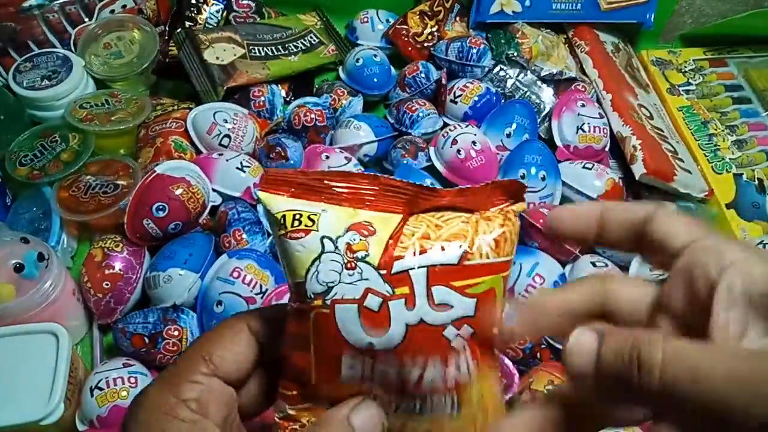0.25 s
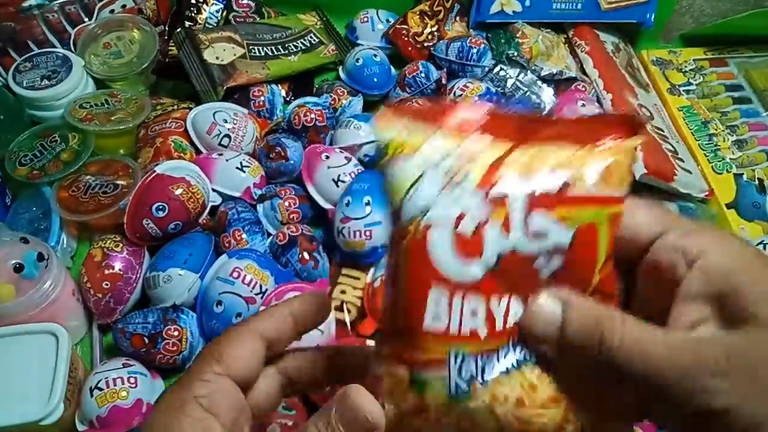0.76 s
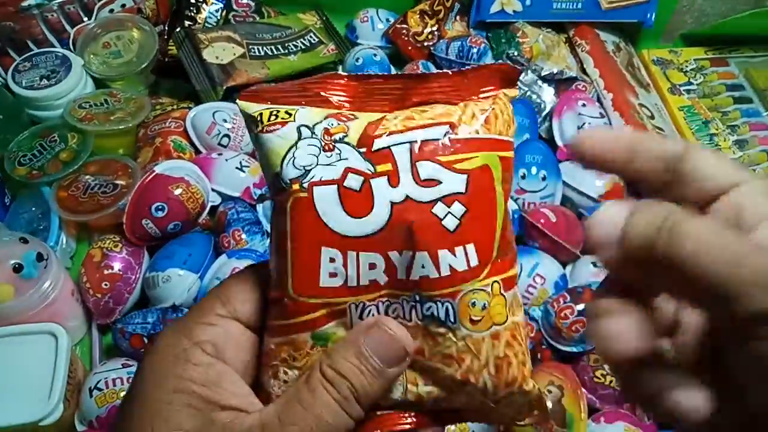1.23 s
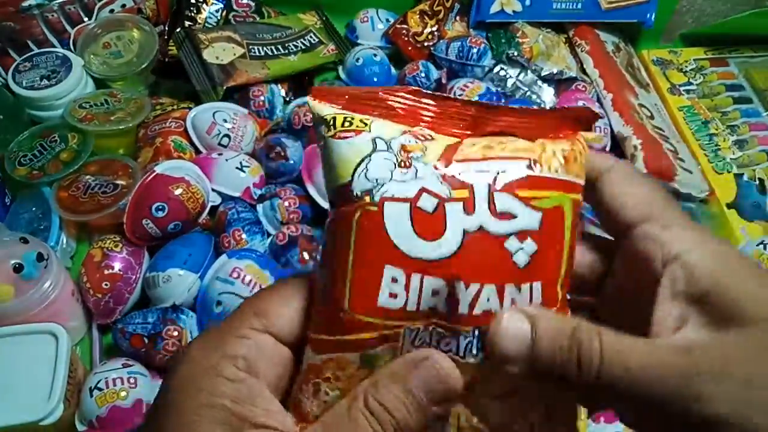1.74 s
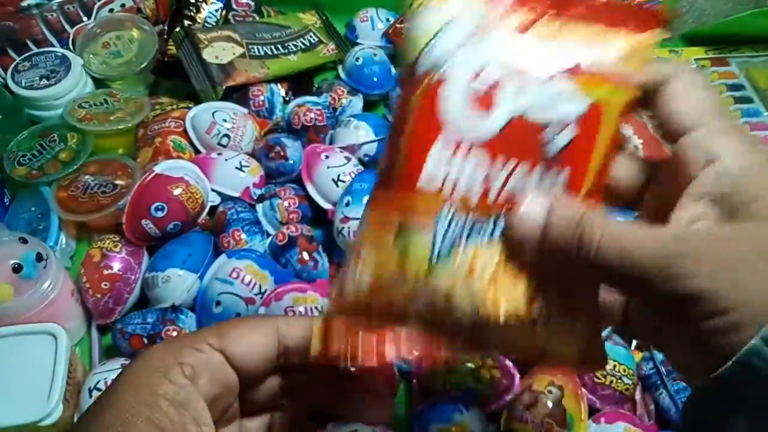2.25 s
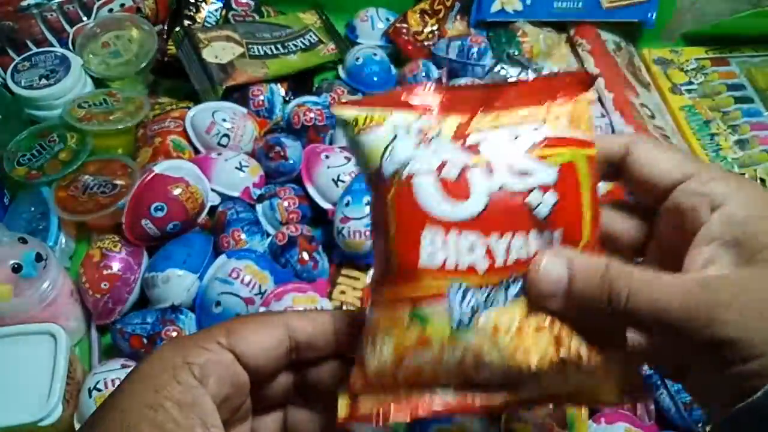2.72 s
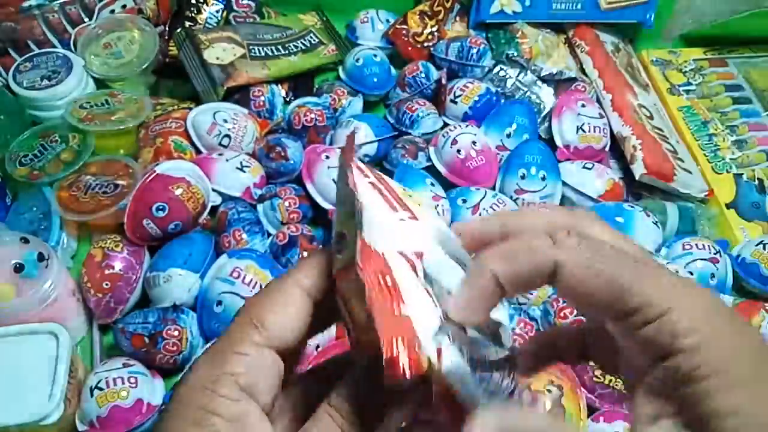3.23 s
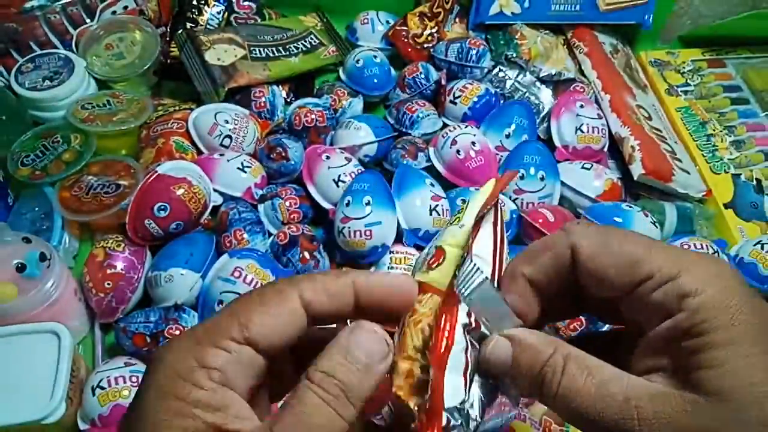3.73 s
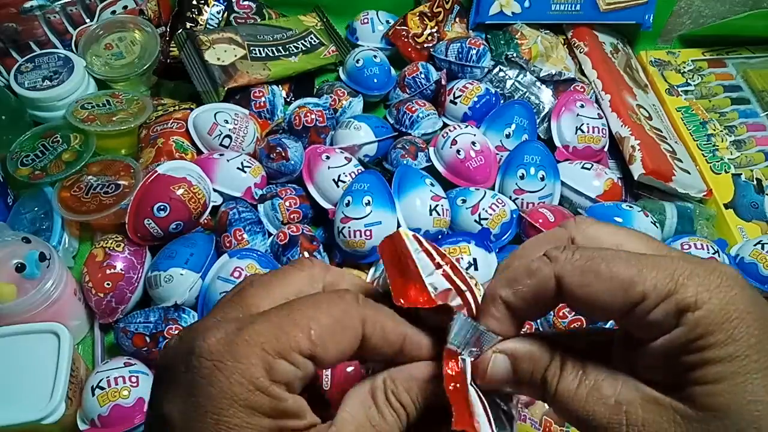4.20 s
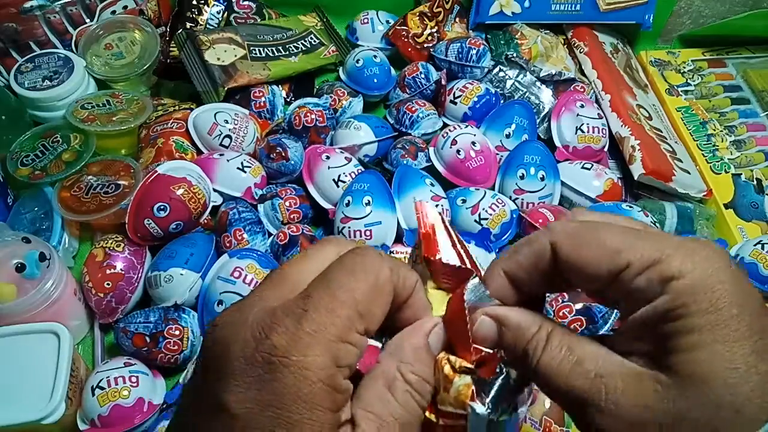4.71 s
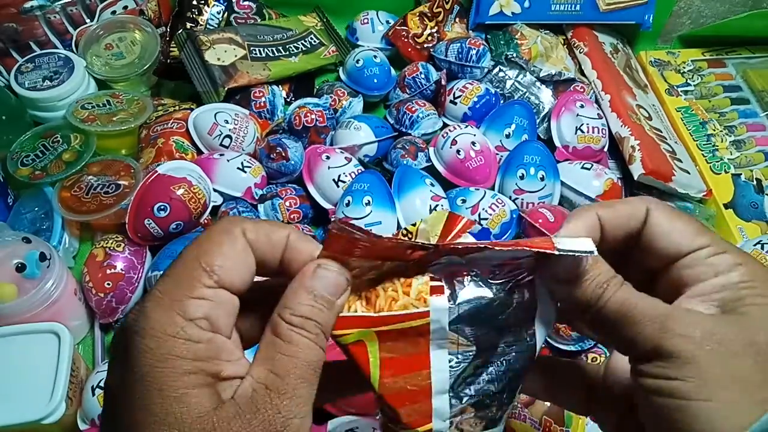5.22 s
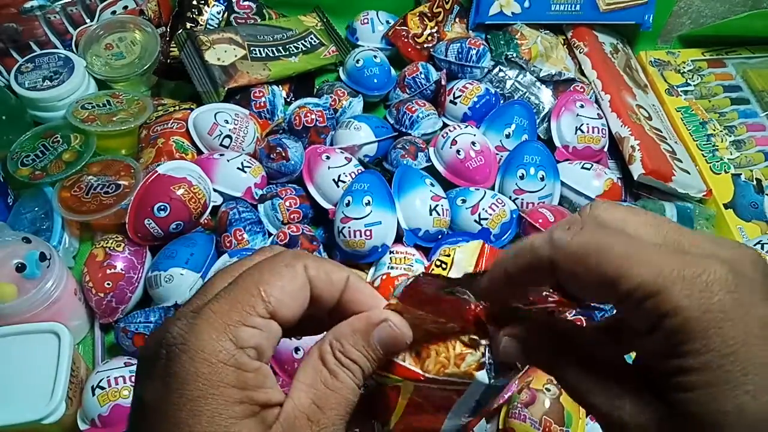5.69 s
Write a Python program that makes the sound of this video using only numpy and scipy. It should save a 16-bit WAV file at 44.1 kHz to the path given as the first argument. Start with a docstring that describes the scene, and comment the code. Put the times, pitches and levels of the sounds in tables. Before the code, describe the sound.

A finger slaps a puffy foil snack packet, dry noodles are shaken in rattling strokes, then the film crackles and the seam rips open.

```python
"""Dry noodles in a foil-lined packet

A finger slaps the air-filled packet five times: film cracks over a damped bounce of the trapped air.
After the third slap and again after the fifth the dry noodles are shaken, clicks swelling at each stroke.
The film is pinched and crackles, each flipping crease being a brief crack with a ringing facet.
The seam rips open in two pulls, a fast run of tiny breaks, and the open packet rustles.
All of it is heard close by in a small room, over a quiet hiss, a rumble and a low drone."""
import sys
import numpy as np
from scipy import signal
from scipy.fft import rfft, irfft
from scipy.io import wavfile

SR = 44100
rng = np.random.default_rng(int(sys.argv[2]) if len(sys.argv) > 2 else 0)


def dump_mix(stems):
    """Bounce the given channels to the path in sys.argv[1] as a 16-bit WAV at rate SR."""
    frames = np.atleast_2d(stems).T  # one column per channel
    limited = np.clip(frames, -1, 1)  # hard clip at full scale
    pcm = np.round(limited * 32767).astype(np.int16)
    wavfile.write(sys.argv[1], SR, pcm)


N = 262395

# Levels in the tables are relative: the source functions add their own trims.
# quiet-room noise spectrum: frequency_hz, level_db
HUSH_SPECTRUM = [(25, -17), (60, 3.5), (105, -1.5), (180, -3), (1000, -24), (3500, -16), (6000, -40),
                 (10000, -36), (15000, -31)]
# low drone that comes and goes: time_s, level_db
DRONE_LEVEL = [(0, -68), (2.3, -60.5), (4.2, -66.5), (4.6, -57.5), (5.95, -55)]
# reverberation of the room: frequency_hz, t60_s
ROOM_DECAY = [(100, 0.34), (250, 0.27), (800, 0.17), (3000, 0.24), (6000, 0.18), (14000, 0.36)]
# soft bumps of the hands on the packet: start_s, level_db, pitch_hz
BUMPS = [(0.597, -42, 264), (1.203, -40, 318), (1.818, -43, 222), (5.537, -40.5, 304), (5.633, -39, 220),
         (5.701, -39.5, 192), (5.829, -37, 268), (5.934, -28, 250)]
# spectrum of flipping film: frequency_hz, level_db
FILM_SPECTRUM = [(40, -70), (100, -33), (250, -8), (500, -9), (800, -3), (1200, -5), (2400, -2.5),
                 (3700, -1), (4400, -4.5), (5500, -8.5), (7500, -21.5), (10000, -32), (15000, -31)]
# effort of the fingers working the film: time_s, level_db
FINGER_EFFORT = [(3.2, -42.5), (3.6, -41), (3.88, -37), (4.17, -46), (4.33, -36.5), (4.47, -43.5),
                 (4.9, -45), (5.35, -50), (5.79, -49.5), (5.95, -28)]
# folds collapsing in clumps of small creases: peak_s, level_db, half_length_s
FOLD_COLLAPSES = [(0.665, -23, 0.0091), (3.636, -29, 0.017), (3.676, -30, 0.0097), (3.758, -30.5, 0.0099),
                  (3.83, -26, 0.009), (3.982, -22, 0.015), (4.285, -16, 0.0052), (4.193, -34.5, 0.0087),
                  (4.354, -28.5, 0.008), (4.567, -32, 0.02), (4.679, -34.5, 0.02), (5.41, -36, 0.014),
                  (5.539, -34.5, 0.005), (5.645, -37, 0.011)]
# large creases snapping through: time_s, level_db, facet_pitch_hz, ring_to_crack_db
SNAPS = [(0.614, -22, 3670, -13), (0.719, -16.5, 1720, -8), (0.918, -3, 3300, 19), (0.976, -7, 865, 15),
         (1.162, -12.5, 3330, 0.5), (1.648, -9.5, 2890, -4.5), (1.657, -9.5, 3400, 4),
         (1.802, -30.5, 2930, -11), (1.865, -14, 1540, -13), (1.923, -4, 3930, -3.5), (2.317, -11, 3380, 0),
         (3.293, -14.5, 2920, -5), (3.348, -24, 2120, 8), (3.393, -27.5, 3480, 2),
         (3.495, -5.5, 2140, -4.5), (3.51, -2.5, 790, 7.5), (3.598, -18, 2500, -4),
         (3.631, -14.5, 3170, 18), (3.683, -19.5, 1010, 15), (3.753, -12.5, 3200, -4.5),
         (3.821, -4.5, 3280, -1.5), (3.84, -6, 1770, -3), (3.868, -15, 1770, 23), (3.9, -18, 2920, 14),
         (3.962, -8, 3320, -13), (3.973, -7.5, 3670, -7), (3.997, -18, 3550, -15), (4.016, -14.5, 3730, -2),
         (4.028, -16.5, 2260, 2), (4.051, -14, 2180, 15), (4.059, -14.5, 2840, 0), (4.082, -11, 1830, 7),
         (4.119, -10.5, 2750, 1), (4.234, -7.5, 2850, 20), (4.282, -11.5, 3800, 5), (4.351, -10, 3300, -2),
         (4.378, -13.5, 2800, -4.5), (4.43, -19, 3600, -11), (4.474, -22, 1740, -8),
         (4.499, -19.5, 2800, -3.5), (4.542, -22, 4170, -10), (4.563, -18, 1690, -14),
         (4.618, -24, 3900, -25), (4.682, -20, 2900, -12), (4.72, -20, 2170, 25), (4.733, -23.5, 3470, 14),
         (4.818, -23, 3500, -8), (4.835, -20, 2900, -21), (4.861, -23, 3100, -12), (4.957, -6.5, 3730, -3),
         (4.977, -7.5, 1230, 1), (4.987, -6.5, 2700, 13), (5.124, -15, 3430, 9), (5.142, -15, 2860, 4),
         (5.154, -4, 895, -1), (5.184, -3, 3660, -2), (5.213, -8.5, 750, -2), (5.237, -14, 3660, -16),
         (5.496, -23.5, 2270, -5), (5.672, -27.5, 3750, 1), (5.699, -24, 4030, -12)]
# spectrum of the tearing seam: frequency_hz, level_db
SEAM_SPECTRUM = [(40, -45), (120, -21), (300, -2.5), (550, -7.5), (800, -3.5), (1200, -6), (2700, -7),
                 (3700, -5), (5200, -8.5), (7400, -20), (10300, -30.5), (15000, -29)]
# pulls that open the seam: start_s, length_s, full_force_db, scattered_noodles_db
PULLS = [(4.919, 0.057, -16.5, -30), (5.11, 0.13, -17.5, -44)]
# spectrum of noodles hitting film: frequency_hz, level_db
NOODLE_SPECTRUM = [(40, -54), (90, -17), (140, -15), (250, -6), (550, -6), (820, 1), (1200, -4), (1600, -2),
                   (3300, -5), (4300, -9), (5500, -18), (7500, -34.5), (11000, -46.5), (15000, -43.5)]
# bouts of shaking: first_landing_s, length_s, first_beat_s, beat_shortening_s, start_db, fade_db
SHAKES = [(0.815, 0.32, 0.0795, 0.00097, -16, 17.5), (2.038, 1.01, 0.0772, 0.00097, -20, 8)]
# single drops of the noodles: tips, turns and the last weak stroke of the shaking:
# peak_s, level_db, half_length_s
DROPS = [(0.662, -28.5, 0.012), (0.718, -34, 0.037), (1.172, -26.5, 0.018), (1.201, -26, 0.0065),
         (1.832, -43.5, 0.017), (1.871, -27.5, 0.0066), (1.924, -27, 0.024), (3.104, -34.5, 0.02),
         (3.182, -29, 0.016), (3.234, -29, 0.0086), (3.28, -22.5, 0.0091), (3.485, -27.5, 0.012),
         (3.524, -27, 0.012)]
# loose crumbs shifting as the opened packet is handled: time_s, level_db
SHIFTING = [(5.28, -48), (5.78, -52), (5.92, -40.5), (5.95, -27.5)]
# spectrum of a slap on the film: frequency_hz, level_db
SLAP_SPECTRUM = [(40, -10.5), (100, -0.5), (250, -2), (450, -7), (800, -0.5), (1400, -1.5), (3000, 0),
                 (4200, -1.5), (5500, -18.5), (7500, -26.5), (10000, -41), (15000, -36)]
# finger slaps: time_s, crack_db, crack_decay_s, thump_db, thump_hz, scattered_noodles_db, settle_db_per_s
SLAPS = [(0.0072, -1.5, 0.011, -12.5, 202, -17.5, 206), (0.1984, -2.5, 0.0095, -18.5, 146, -15.5, 162),
         (0.3747, -2.5, 0.003, -21, 165, -21, 133), (1.3927, -1.5, 0.0055, -14, 240, -14.5, 244),
         (1.6008, -6, 0.0066, -15.5, 116, -19, 192)]

EDGE_HZ = 15800  # upper band limit
# a pull starts this much weaker, builds, and lets go with a jolt
SLACK_DB, LET_GO_S, PULL_SETTLE_DB_PER_S = -12, 0.012, 196
TIRING = 3.73  # the shaking holds its strength, then fades with this power of the time
# half length of a firm landing; loose crumbs slide on after it and settle
LAND_S, SLIDE_DB, SETTLE_DB_PER_S = 0.012, -12, 146
FIRM_DB, SMEAR = -20, 0.49  # the weaker a stroke is than FIRM_DB, the more its landing is spread out
# by chance a stroke lands looser, so weaker (dB) and longer (share), or tighter, the reverse
UNEVEN_DB, UNEVEN_SPREAD = 1.0, 0.25
DROP_SLIDE_DB, DROP_SETTLE_DB_PER_S = -22, 208  # the same sliding after a single drop
SCATTER_RISE_S = 0.0081  # time constant with which the sound of thrown crumbs builds


def gain_of(db):
    """Logarithmic law of level: decibels to amplitude."""
    return 10 ** (np.asarray(db) / 20)


def unit(x):
    """Energy normalisation: scales the sum of squares to 1."""
    return x / np.sqrt(np.sum(x ** 2) + 1e-20)


def read(points, hz):
    """Interpolation of a spectrum on a log-frequency axis."""
    f, value = np.transpose(points)
    return np.interp(np.log(hz + 1), np.log(f + 1), value)


def level(rows):
    """Level curve as amplitude at every sample, virtually silent outside its span."""
    s, db = np.transpose(rows)
    return gain_of(np.interp(np.arange(N) / SR, s, db, left=-120, right=-120))


def add(mix, s, sound):
    """Superposition: mixes a sound in at time s."""
    part = mix[max(round(s * SR), 0):][:len(sound)]
    part += sound[:len(part)]


def colour(x, points, size=2048):
    """Minimum-phase filtering: a causal response lets clicks keep their sharp front."""
    log_gain = np.log(gain_of(read(points, abs(np.fft.fftfreq(size, 1 / SR)))))
    taps = np.fft.ifft(np.exp(np.conj(signal.hilbert(log_gain)))).real
    return signal.oaconvolve(x, unit(taps[:size // 2]))[:len(x)]


def facet(hz, ring_db, ring_s, crack_s=0.00034, size=1024):
    """Impulse excitation: a crease flips with a brief crack and the film beside it rings for a few cycles."""
    t = np.arange(size) / SR
    crack = unit(rng.standard_normal(size) * np.exp(-t / crack_s))
    ring = unit(np.exp(-t / ring_s) * np.sin(2 * np.pi * hz * t))
    return unit(crack + gain_of(ring_db) * ring)


def crackle(per_s, spread_db, ring_db, ring_s, spectrum, steady_s, variety_db=9, count=30):
    """Shot noise: random clicks of many sizes and pitches, held near rms 1 over steady_s."""
    chance = rng.random(N)
    size = np.minimum(rng.exponential(1, N), 4)
    which = rng.integers(0, count, N)
    clicks = (chance < per_s / SR) * gain_of(spread_db * size) * rng.choice([-1, 1], N)
    # three ring strengths take turns over the pitches
    bank = np.array([facet(hz, ring_db + variety_db * (k % 3 - 1), ring_s)
                     for k, hz in enumerate(np.linspace(450, 4600, count))])
    at = np.flatnonzero(clicks)
    places = at[:, None] + np.arange(bank.shape[1])
    sounds = clicks[at, None] * bank[which[at]]
    out = np.bincount(places.ravel(), sounds.ravel(), N)[:N]
    out = colour(out, spectrum)
    window = signal.windows.hann(int(steady_s * SR))
    power = abs(signal.oaconvolve(out ** 2, window / window.sum(), "same"))
    return out / np.sqrt(power + 1e-4 * np.mean(out ** 2))


def hush(hush_db=-62):
    """Stationary noise: the quiet room is a low rumble under faint hiss."""
    return gain_of(hush_db) * np.sqrt(N) * unit(colour(rng.standard_normal(N), HUSH_SPECTRUM))


def drone(drone_hz=105):
    """Band-filtered noise: a low drone about an octave wide with a slowly moving level."""
    octaves = np.log2((np.fft.rfftfreq(N, 1 / SR) + 1) / drone_hz)
    band = irfft(rfft(rng.standard_normal(N)) / (1 + (2 * octaves) ** 2), N)
    return level(DRONE_LEVEL) * np.sqrt(N) * unit(band)


def room(x, tail_db=-9, echo_db=-18, echo_s=.0132, build_s=0.022, soak_db=-5, size=22050):
    """Reverberation: one clear reflection, then a short tail of sparse taps that dies band by band."""
    taps = rng.choice([-1., 1.], size) * (rng.random(size) < 3000 / SR)
    hz, t, z = signal.stft(taps, SR, nperseg=256)
    decay = gain_of(-60 * t / read(ROOM_DECAY, hz)[:, None])
    tail = signal.istft(z * decay, SR, nperseg=256)[1][:size]
    build = 1 - np.exp(-np.arange(size) / SR / build_s)
    response = gain_of(tail_db) * unit(tail * build)
    add(response, echo_s, gain_of([echo_db]))
    # the surroundings soak up the top octaves
    soak = gain_of(np.interp(np.fft.rfftfreq(size, 1 / SR), [4500, 9000], [0, soak_db]))
    return x + signal.oaconvolve(x, irfft(rfft(response) * soak, size))[:N]


def thud(hz, decay_s, rise_s, size=6000):
    """Damped oscillation: trapped air bounces for a few cycles; the sound follows the film's speed."""
    t = np.arange(size) / SR
    bulge = np.sin(2 * np.pi * hz * t) * np.exp(-t / decay_s) * (1 - np.exp(-t / rise_s))
    return np.gradient(bulge) * SR / (2 * np.pi * hz)


def bumps(bump_db=6, decay_s=0.0073, rise_s=0.0021):
    """Soft excitation: a push sounds the air inside without cracking the film."""
    out = np.zeros(N)
    for s, db, hz in BUMPS:
        add(out, s, gain_of(db + bump_db) * thud(hz, decay_s, rise_s))
    return out


def ticks(tick_db=24, spread_db=2.0, taut_hz=500):
    """Random buckling: middling creases in pinched film flip with a dry tick, as hard as it is worked."""
    per_s, ring_db, ring_s = 28, -3, .0008
    out, effort = np.zeros(N), level(FINGER_EFFORT)
    for k, (when, pitch, strength) in enumerate(rng.random((int(per_s * N / SR), 3))):
        s = (k + when) / per_s
        click = facet(900 + 3000 * pitch, ring_db, ring_s)
        gain = gain_of(tick_db + spread_db * (2 * strength - 1))
        add(out, s, effort[int(s * SR)] * gain * click)
    return signal.lfilter(*signal.butter(1, taut_hz, "high", fs=SR), colour(out, FILM_SPECTRUM))


def bell(s, db, half_s):
    """Gaussian envelope: power of a bell-shaped burst."""
    return gain_of(db) ** 2 * np.exp(-np.minimum(((np.arange(N) / SR - s) / half_s) ** 2, 100))


def straining():
    """Power addition: crinkle amplitude from the fingers' effort and the folds that collapse."""
    return np.sqrt(level(FINGER_EFFORT) ** 2 + sum(bell(*row) for row in FOLD_COLLAPSES))


def crinkle(crinkle_db=-1.5, taut_hz=700):
    """Stick-slip: small creases keep flipping under the fingers, in clumps where a fold collapses."""
    ring_s, slip_db, slip_s = .0007, 3, .012
    grains = crackle(per_s=520, spread_db=4.0, ring_db=-2.0, ring_s=ring_s,
                     spectrum=FILM_SPECTRUM, steady_s=0.11)
    # small, tightly pinched patches radiate little bass
    grains = signal.lfilter(*signal.butter(1, taut_hz, "high", fs=SR), grains)
    # the fingertips stick and slip, so the strain comes in short fits
    knots = np.arange(0, N, slip_s * SR)
    slips = np.clip(rng.standard_normal(len(knots)), -2, 2)
    fits = gain_of(slip_db * np.interp(np.arange(N), knots, slips))
    return gain_of(crinkle_db) * straining() * fits * grains


def snaps(ring_s=0.00089, flutter_db=-8, flutter_s=0.0024, snap_db=13, lag_s=0.001002,
          creep_db=-22, size=1024):
    """Snap-through: a large crease creeps, flips, rings its facet and leaves the sheet fluttering."""
    out, t = np.zeros(N), np.arange(size) / SR
    creep_s = .005  # the creep sounds this long ahead of the tabled time
    for s, db, hz, ring_db in SNAPS:
        shape = np.exp(-t / flutter_s) * (1 - np.exp(-t / flutter_s))
        flutter = unit(rng.standard_normal(size) * shape)
        sheet = signal.unit_impulse(size) + gain_of(flutter_db) * flutter
        flip = signal.fftconvolve(facet(hz, ring_db, ring_s), sheet)[:size]
        add(out, s + lag_s, gain_of(db + snap_db) * unit(colour(flip, FILM_SPECTRUM)))
        add(out, s - creep_s, gain_of(db + snap_db + creep_db) * unit(colour(flutter, FILM_SPECTRUM)))
    return out


def pulling():
    """Build-up and release: each pull grows to full force and dies as the seam lets go."""
    out, t = np.zeros(N), np.arange(N) / SR
    for s, length, db, _ in PULLS:
        force = gain_of(db + SLACK_DB * np.maximum(1 - t / length, 0) ** 2)
        release = np.exp(-np.maximum(t - length, 0) / LET_GO_S)
        add(out, s, force * release)
    return out


def rip(rip_db=0, sealed_hz=420):
    """Progressive fracture: the seam parts in a quick run of tiny, uneven breaks."""
    breaks = crackle(per_s=1700, spread_db=3.3, ring_db=7, ring_s=0.00075,
                     spectrum=SEAM_SPECTRUM, steady_s=0.037)
    # the second pull frees a wide flap of film, which adds the bass
    thin = signal.sosfiltfilt(signal.butter(2, sealed_hz, "high", fs=SR, output="sos"), breaks)
    opened = np.interp(np.arange(N) / SR, [5.14, 5.21], [0, 1])
    return gain_of(rip_db) * pulling() * (thin + opened * (breaks - thin))


def settling(s, db, db_per_s):
    """Exponential decay: power of crumbs that are thrown up at time s, come down and settle."""
    t = np.maximum(np.arange(N) / SR - s, 0)
    return (gain_of(db - db_per_s * t) * (1 - np.exp(-t / SCATTER_RISE_S))) ** 2


def strokes(count=20):
    """Quickening oscillation: landings (time_s, level_db, half_length_s) weaken, blur and vary by chance."""
    rows, k = [], np.arange(count)
    for start, length, beat, quicken, first_db, fade_db in SHAKES:
        after = k * beat - quicken * k * (k - 1) / 2
        for s, loose in zip(after[after < length], rng.uniform(-1.02, 1, count)):
            db = first_db - fade_db * (s / length) ** TIRING
            half = LAND_S * gain_of(SMEAR * (FIRM_DB - db))
            rows.append((start + s, db - UNEVEN_DB * loose, half * (1 + UNEVEN_SPREAD * loose)))
    return rows


def agitation():
    """Power addition: every stroke, drop, slap and pull throws the noodles, and they settle."""
    power = level(SHIFTING) ** 2
    for s, db, half in strokes():
        power += bell(s, db, half) + settling(s, db + SLIDE_DB, SETTLE_DB_PER_S)
    for s, db, half in DROPS:
        power += bell(s, db, half) + settling(s, db + DROP_SLIDE_DB, DROP_SETTLE_DB_PER_S)
    for s, *_, db, db_per_s in SLAPS:
        power += settling(s, db, db_per_s)
    for s, length, _, db in PULLS:
        power += settling(s + length, db, PULL_SETTLE_DB_PER_S)
    return np.sqrt(power)


def noodles(noodles_db=0.5):
    """Granular impact: dry crumbs hit the film together at each stroke, and slide in between."""
    grains = crackle(per_s=2600, spread_db=2.5, ring_db=-6, ring_s=0.00069,
                     spectrum=NOODLE_SPECTRUM, steady_s=0.14)
    return gain_of(noodles_db) * agitation() * grains


def slaps(thump_s=0.0059, thump_rise_s=0.00053, crack_db=16, brush_db=-27, brush_s=.006, size=6000):
    """Impact on an air cushion: a finger brushes the film, buckles many creases at once and bounces."""
    out, t = np.zeros(N), np.arange(size) / SR
    for s, db, crack_s, thump_db, hz, *_ in SLAPS:
        # a faint brush leads up to the blow
        force = np.where(t < brush_s, gain_of(brush_db), np.exp(-(t - brush_s) / crack_s))
        crack = unit(colour(rng.standard_normal(size) * force, SLAP_SPECTRUM))
        add(out, s - brush_s, gain_of(db + crack_db) * crack)
        add(out, s, gain_of(thump_db) * thud(hz, thump_s, thump_rise_s))
    return out


def scene():
    """Superposition: the packet sounds in the room over the background."""
    packet = slaps() + bumps() + noodles() + snaps() + ticks() + crinkle() + rip()
    return (room(packet) + hush() + drone())[None]


def record(dry, low_cut_hz=72):
    """Transduction: the microphone drops deep bass and rounds off the loudest cracks; then the band limit."""
    thin = signal.sosfilt(signal.butter(4, low_cut_hz, "high", fs=SR, output="sos"), dry)
    held = thin / (1 + thin ** 8) ** (1 / 8)
    band_limit = signal.firwin(511, EDGE_HZ, window=("kaiser", 9), fs=SR)
    return signal.oaconvolve(held, band_limit[None], "same")


dry = scene()
out = record(dry)
dump_mix(out)
```